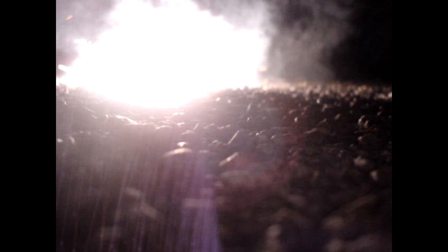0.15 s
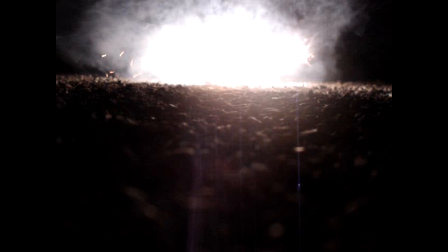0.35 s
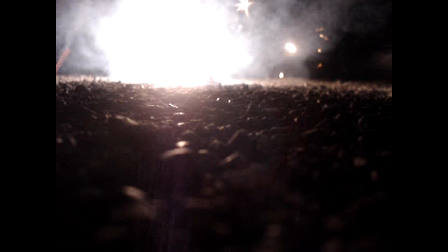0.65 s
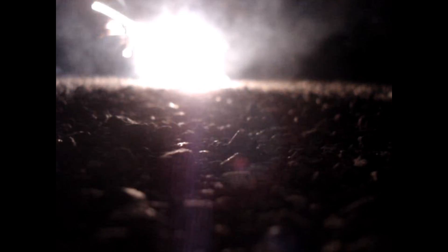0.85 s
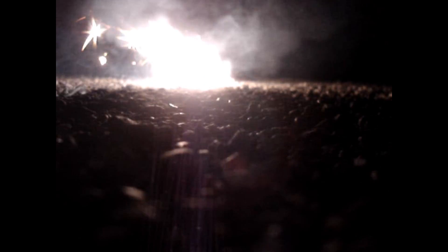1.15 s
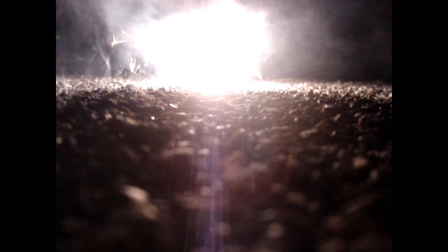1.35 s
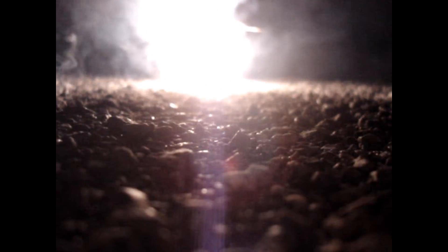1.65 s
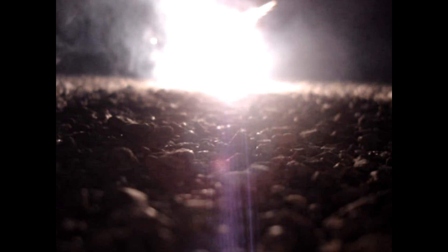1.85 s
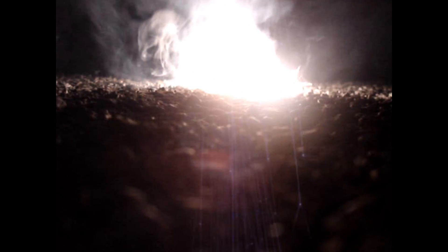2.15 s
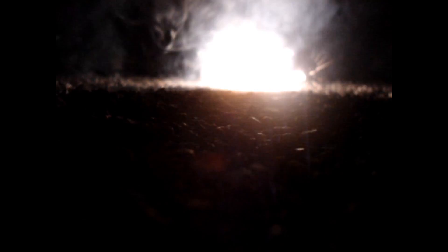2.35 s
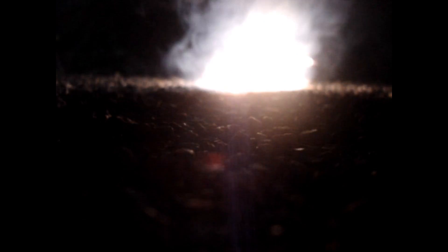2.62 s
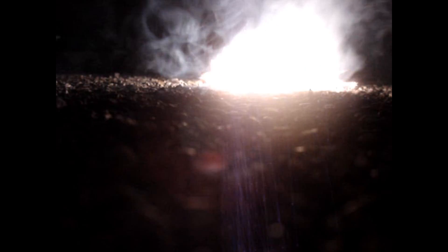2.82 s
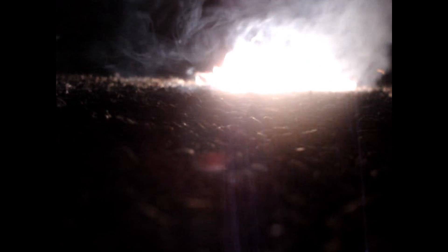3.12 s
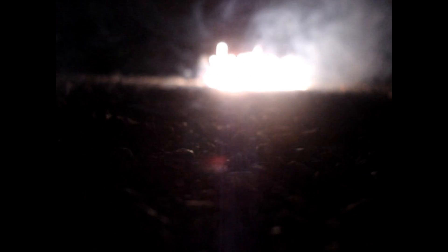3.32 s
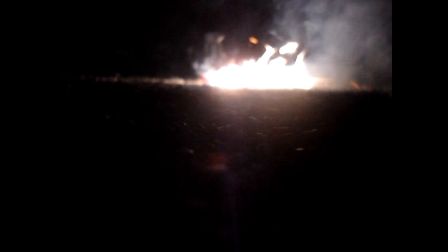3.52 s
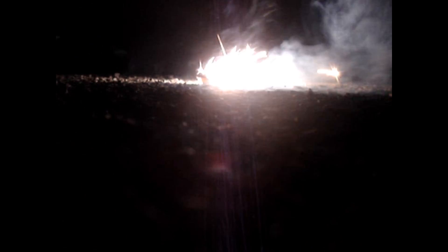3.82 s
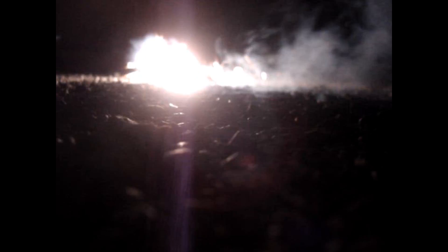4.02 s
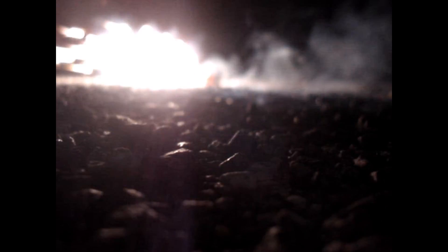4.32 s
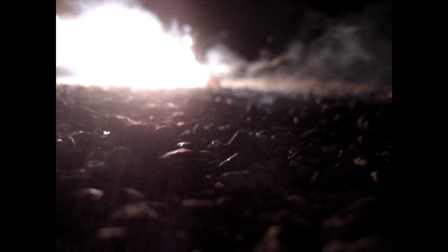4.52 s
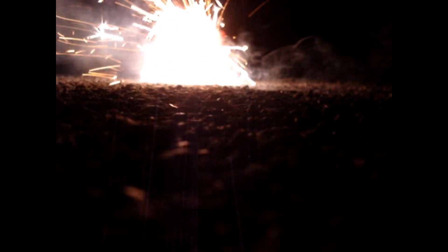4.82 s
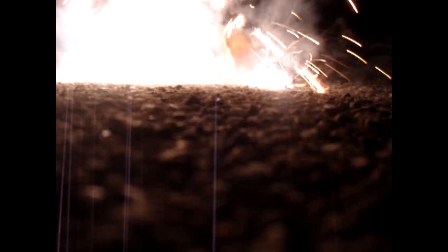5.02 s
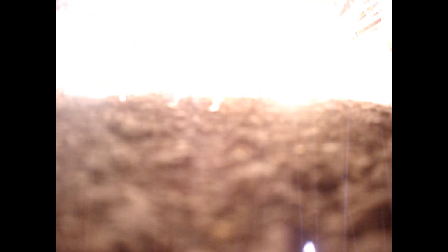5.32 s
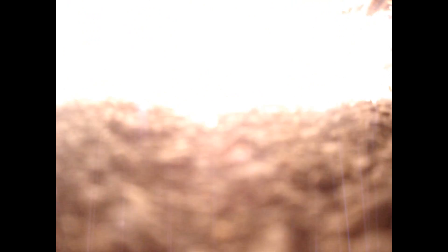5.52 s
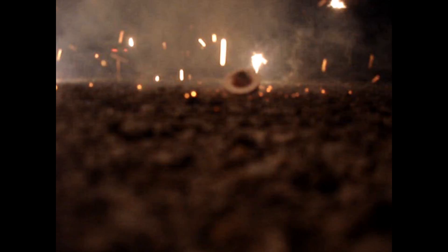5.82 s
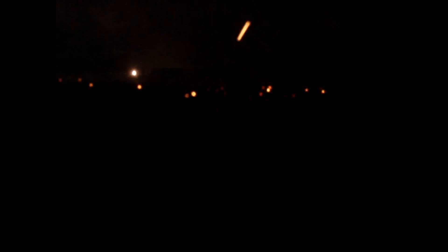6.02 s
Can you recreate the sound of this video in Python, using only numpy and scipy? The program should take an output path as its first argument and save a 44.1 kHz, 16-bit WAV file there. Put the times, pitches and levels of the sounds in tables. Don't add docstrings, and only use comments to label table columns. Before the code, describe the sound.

A close, dry recording of a burning ground firework. Turbulent gas hisses and roars steadily, swelling in short puffs, with fine crackle and one early sharp crack. It sputters, catches again in a loud snapping flare, then fades. A third of a second of machine-gun-like bursts follows, thumping the overloaded small microphone, with embers sighing and a few stragglers popping. Very faint machinery hum lies far behind.

```python
import sys
import numpy as np
from scipy import signal
from scipy.io import wavfile
from scipy.ndimage import uniform_filter1d, minimum_filter1d

SR = 44100
rng = np.random.default_rng(int(sys.argv[2]) if len(sys.argv) > 2 else 0)


def transcribe(signal):
    frames = np.atleast_2d(signal).T
    limited = np.clip(frames, -1, 1)
    pcm = np.round(limited * 32767).astype(np.int16)
    wavfile.write(sys.argv[1], SR, pcm)


def invert_db(level):
    return 10 ** (np.asarray(level, dtype=float) / 20)


N = 271638


def rms_one(x):
    return x / np.sqrt(np.mean(x ** 2) + 1e-20)


def butter(x, hz, kind, order=2):
    return signal.sosfilt(signal.butter(order, hz, kind, fs=SR, output="sos"), x)


def fade_away(x, seconds):
    return signal.lfilter([1], [1, -np.exp(-1 / (seconds * SR))], x + 1e-18)


def drift(rate):
    r = np.exp(-80 * np.pi * rate / SR)
    noise = rng.standard_normal(N // 40 + 2002)
    slow = signal.lfilter([1], [1, -2 * r, r * r], noise)[2000:]
    return np.interp(np.arange(N) / 40, np.arange(len(slow)), rms_one(slow))


def bands(source, spectrum):
    edges = 89 * 2 ** (np.arange(36) / 5)
    hz_points, db_points = np.transpose(spectrum)
    for k, (low, high) in enumerate(zip(edges, edges[1:])):
        hz = np.sqrt(low * high)
        level_db = np.interp(np.log(hz), np.log(hz_points), db_points)
        yield hz, invert_db(level_db) * butter(source[k % 2], [low, high], "band")


# frequency in Hz, level in dB per Hz.
NIGHT_COLOUR = [(35, -57), (60, -22), (886, 2), (1510, -9), (1720, -14), (9900, 8)]
# frequency in Hz, level in dB rms.
FAR_HUM = [
    (60, -72),
    (120, -61),
    (240, -58),
]


def night():
    air = sum(part for hz, part in bands(rng.standard_normal((2, N)), NIGHT_COLOUR))
    hum = np.zeros(N)
    for hz, db in FAR_HUM:
        hum += invert_db(db + 0.5 + 2.2 * drift(3.6)) * np.sin(2 * np.pi * hz * np.arange(N) / SR)
    return invert_db(-69.5) * rms_one(air), hum


# time in seconds, level in dB.
DRAUGHT = [(0, -54), (.5, -67), (1.02, -66.5), (2.5, -70), (3.8, -67), (4.25, -62), (5.3, -58), (5.5, -50),
           (5.72, -63), (5.77, -66), (5.89, -72), (5.92, -80), (6.16, -78)]


def draught():
    level_db = np.interp(np.arange(N) / SR, *np.transpose(DRAUGHT))
    return invert_db(level_db) * rms_one(butter(rng.standard_normal(N), [30, 95], "band"))


# time in seconds, hiss in dB, brightness in dB, roar in dB.
STEADY_BURN = [(0.0, -28, -1.5, -7.5), (0.17, -30.5, 1, -7.5), (0.5, -31.5, 1.5, -7.5), (0.58, -27, 0, -9),
               (0.76, -28, -3, -12), (1.02, -30.5, 3.5, -9.5), (1.4, -30.5, 3.5, -10),
               (1.62, -30.5, -5, -11), (1.92, -28.5, -2, -11.5), (2.08, -33, -0.5, -9.5),
               (2.58, -34.5, -7.5, -8), (2.7, -31.5, 5, -9), (2.9, -30, 2.5, -9.5),
               (3.52, -29.5, 0.5, -8.5), (3.68, -31.5, 0, -9), (3.9, -29, -3, -9),
               (4.42, -28.5, 0.5, -10.5), (4.73, -26.5, -1.5, -9)]
# time in seconds, hiss in dB, brightness in dB, roar in dB.
FALTER = [
    (4.75, -30, 5, -10),
    (4.785, -35.5, -13, -3),
    (4.8, -43.5, -11, -4.5),
    (4.87, -42, -18, -2.5),
    (4.893, -34, 6, -8),
    (4.915, -24.5, 3, -5),
    (4.94, -23, -5, -10),
]
# time in seconds, hiss in dB, brightness in dB, roar in dB.
DYING = [
    (4.97, -29, -2, -12),
    (5.006, -33, -14, -6),
    (5.082, -35, -22.5, -4),
    (5.11, -43, -10, -3),
    (5.208, -48.5, 0, -6),
    (5.3, -48, -2, -3),
    (5.32, -58, -1, -2),
    (5.77, -69, 4.5, -7),
    (6.16, -75, -4, -5),
]
# peak in seconds, gain in dB, rise in seconds, fall in seconds.
SURGES = [(0.104, 2.5, 0.11, 0.054), (0.266, 7, 0.087, 0.015), (0.345, 4.5, 0.059, 0.091),
          (0.73, 0.5, 0.11, .03), (1.15, 2, 0.064, 0.13), (1.468, 5, 0.044, 0.096), (1.764, 3, 0.1, 0.029),
          (1.84, -0.5, 0.031, .06), (2.22, 2, 0.03, 0.12), (2.73, 0, 0.072, 0.022), (3.22, 2, 0.032, 0.031),
          (3.76, 3.5, 0.072, 0.18), (4.15, 2, 0.11, 0.045), (4.33, 2.5, .04, 0.096),
          (4.81, 9, 0.0091, 0.012), (4.836, 7.5, .012, 0.032)]
# start in seconds, level in dB, fade in dB per second.
EMBERS = [
    (5.35, -51, 23),
    (5.386, -54, 31),
    (5.66, -55.5, 120),
    (5.77, -51, 137),
]


def effort():
    t = np.arange(N) / SR
    s, hiss_db, bright_db, roar_db = np.transpose(STEADY_BURN + FALTER + DYING)
    surge_db = np.zeros(N)
    for peak, db, rise, fall in SURGES:
        surge_db += db * np.clip(np.minimum(1 + (t - peak) / rise, 1 - (t - peak) / fall), 0, 1)
    hiss_db = np.interp(t, s, hiss_db) + surge_db
    for start, db, fade in EMBERS:
        sigh_db = np.where(t > start, db - fade * (t - start), -np.inf)
        hiss_db = np.maximum(hiss_db, sigh_db)
    bright_db = np.interp(t, s, bright_db) - 0.2 * surge_db
    roar_lag_s, roar_inertia = 0.069, 0.37
    r = np.exp(-1 / (roar_lag_s * SR))
    trailing_db = hiss_db[0] + signal.lfilter([1 - r], [1, -r], hiss_db - hiss_db[0])
    roar_db = np.interp(t, s, roar_db) + roar_inertia * (trailing_db - hiss_db)
    return hiss_db, bright_db, roar_db


# frequency in Hz, level in dB per Hz.
JET_COLOUR = [(100, -22), (125, -15), (165, -14.5), (240, -10.5), (620, -8), (1350, -6), (1650, -3.5),
              (2600, -2), (3400, -3.5), (4200, -7.5), (5000, -2), (5800, -1.5), (7200, -6), (9900, -15)]


def jet(spark_db, sparks_per_s, flutter_db, patchy_db):
    usual_bright_db, usual_roar_db, jet_db = 2.5, -9, 5
    hiss_db, bright_db, roar_db = effort()
    sizes = invert_db(8 * np.minimum(rng.exponential(1, N), 4))
    sparks = sizes * (rng.random(N) < sparks_per_s / SR)
    snaps = rms_one(butter(sparks, 3500, "high", order=1))
    stand_out_db = np.clip(-30 - hiss_db, 0, 5)
    source = rng.standard_normal((2, N)) + invert_db(spark_db + stand_out_db) * snaps
    flutter = flutter_db * (drift(1.9) + 0.49 * drift(45.0))
    out, plain = np.zeros((2, N))
    for hz, part in bands(source, JET_COLOUR):
        top = np.clip(np.log2(hz / 2700) * 0.61, 0, 1)
        low = np.clip(np.log2(1600 / hz), 0, 1)
        if hz > 7000:
            top = top * 0.7
        tilt_db = top * (bright_db - usual_bright_db) + low * (roar_db - usual_roar_db)
        out += part * invert_db(tilt_db + flutter + patchy_db * drift(5.3))
        plain += part
    return invert_db(hiss_db + jet_db) * out / np.std(plain)


# time in seconds, crack in dB, push of air in dB, debris in dB.
LONE_STARS = [(1.7673, -5, -39, -29), (4.79, -17.5, -25, -29), (4.8348, -15, -42, -31),
              (4.8535, -15, -32, -39), (4.9197, -5, -40, -17), (4.9367, 0, -16.5, -45),
              (5.1807, -29, -39, -30), (5.2176, -5, -35, -38), (5.2393, -13.5, -36, -41),
              (5.6527, -21, -37, -54), (5.6774, -21, -55, -42), (5.728, -21, -18, -20),
              (5.737, -12, -41, -23.5), (5.7398, -25, -37, -27), (5.7445, -26, -47, -25),
              (5.75, -23, -18.5, -19.5), (5.7617, -24, -41, -34), (5.925, -31, -58, -49),
              (6.0095, -18, -54, -40), (6.0276, -28, -63, -67), (6.046, -29, -55, -41),
              (6.0732, -36.5, -55, -65), (6.1122, -22.5, -60, -60)]
# time in seconds, crack in dB, push of air in dB, debris in dB.
VOLLEY = [(5.3297, -3, -26, -36), (5.336, -6.5, -38, -26), (5.3476, 0, -25, -21.5),
          (5.3838, -5, -20.5, -27), (5.4067, -6, -15, -30), (5.4103, -5, -22, -32),
          (5.4449, -17, -19.5, -24), (5.4528, -8, -19, -22.5), (5.4577, -21, -35, -35),
          (5.4664, -11, -20, -29), (5.4702, -8, -16.5, -24.5), (5.4735, -2, -28, -46),
          (5.4851, -6.5, -23, -25), (5.505, -7, -41, -18.5), (5.5092, -12, -14.5, -30),
          (5.5134, -10, -22, -20), (5.5213, -12, -20, -24), (5.5282, -21, -13.5, -28),
          (5.5333, -13, -17, -26), (5.538, -17, -35, -28), (5.543, -21, -43, -26),
          (5.5466, -19, -13.5, -45), (5.5573, -11, -15, -27), (5.5684, -17, -14, -33),
          (5.5785, -7, -11.5, -35), (5.5808, -13, -39, -43.5), (5.5895, -6, -39, -26),
          (5.6026, -4.5, -45, -35), (5.6169, -28, -43, -36), (5.6318, -13, -21, -18)]
# start in seconds, length in milliseconds, level in dB.
FIZZES = [(5.3312, 3.9, -20), (5.501, 1.8, -41), (5.394, 3.5, -46), (5.42, 4.5, -40.5), (5.433, 2.4, -61),
          (5.451, 20, -32), (5.507, 5.9, -39), (5.535, 12, -38), (5.616, 6.2, -33), (5.74, 5.2, -35),
          (5.208, 7.1, -36)]


def stars():
    shock, push, spray, fizz = np.zeros((4, N + 200))
    for table, usual_ms in ((LONE_STARS, 0.22), (VOLLEY, 0.15)):
        chances = rng.standard_normal((len(table), 2))
        for (s, crack_db, push_db, debris_db), (toss, size) in zip(table, chances):
            sign = np.sign(toss + 0.7)
            width_ms = usual_ms * invert_db(5.5 * size)
            at = round(s * SR) - 1
            phase = np.arange(200) / max(0.4 * width_ms * SR / 1000, 1.5)
            height = max(invert_db(crack_db + 2.8) - invert_db(push_db + 1.0), invert_db(crack_db - 12.0))
            shock[at:at + 200] += sign * height * (1 - phase) * np.exp(-.8 * phase)
            push[at] += sign * invert_db(push_db + 5.5)
            spray[at + 4] += invert_db(debris_db + 3.0)
    for s, length_ms, level_db in FIZZES:
        fizz[round(s * SR):round((s + length_ms / 1000) * SR)] = invert_db(level_db)
    push_s, mic_low_hz, debris_s = 0.0015, 234, 0.0016
    swing = butter(fade_away(push, push_s), mic_low_hz, "high")
    cracks = butter(butter(shock, 240, "high") + swing, 5500, "low", order=1)
    dying = fade_away(spray, debris_s) + uniform_filter1d(fizz, size=40)
    grit = rng.standard_normal(N) * invert_db(0.87 * drift(440.0))
    debris = dying[:N] * rms_one(butter(grit, [1000, 6500], "band", order=1))
    return cracks[:N] + debris


# time in seconds, depth in dB.
DUCKS = [(0.269, -2), (1.085, -6), (1.491, 3), (1.595, 6.5), (1.77, 3), (2.012, 1.5), (2.132, 2), (3.28, 2),
         (3.57, 4), (4.916, 3.5), (4.938, 25), (5.218, 3), (5.338, -1), (5.349, 5.5), (5.409, 25),
         (5.636, -2)]


def gain_control():
    drops = np.zeros(N)
    for s, depth_db in DUCKS:
        drops[round(s * SR)] = max(depth_db, 0)
    recovery_s = 0.023
    return invert_db(-fade_away(drops, recovery_s))


def scene():
    air, hum = night()
    burn = jet(spark_db=-4.0, sparks_per_s=740, flutter_db=0.13, patchy_db=0.78) + draught()
    audible = np.clip((5.3 - np.arange(N) / SR) / 0.52, .03, 1)
    gain = gain_control()
    offset_db = -34.5
    thump = butter(invert_db(offset_db) * (gain - 1), 11, "high", order=1)
    return np.tile(gain * (burn + air + audible * hum) + thump + stars(), (2, 1))


def starve(x, margin_db, tilt_db, shelf_db, luck_db, hole_share, smear_db):
    frame_s, first_frame_s = 576 / 22050, .0084
    hz, s, spec = signal.stft(x, SR, nperseg=256)
    band, band_hz = np.arange(len(hz)) // 2, hz[::2, None]
    size = np.sqrt([np.mean(np.abs(spec[band == k]) ** 2, axis=0) for k in range(band.max() + 1)])
    frame_peak = np.zeros(int(N / SR / frame_s) + 3)
    sample_frame = ((np.arange(N) / SR - first_frame_s) / frame_s + 1).astype(int)
    np.maximum.at(frame_peak, sample_frame, np.abs(x))
    frame = (s - first_frame_s) / frame_s + 1
    peak = np.maximum(frame_peak[frame.astype(int)], frame_peak[(frame - .5).astype(int)])
    luck = uniform_filter1d(rng.standard_normal(size.shape), size=3) * np.sqrt(3)
    upper = band_hz > 4700
    need_db = 20 * np.log10(peak + 1e-9) - margin_db
    need_db = need_db + upper * (shelf_db + tilt_db * np.log2(band_hz / 5000 + .1))
    need_db = need_db + 2.7 * np.minimum(np.log2(band_hz / 2500 + .02), 0)
    held = -minimum_filter1d(-size ** 2, size=3)
    held_db = 10 * np.log10(uniform_filter1d(held, size=3, axis=0) + 1e-20)
    keep = np.clip((held_db - need_db - luck_db * luck) / 2, .02, 1)
    missed = upper & (rng.random(size.shape) < hole_share)
    holes = minimum_filter1d(minimum_filter1d(1. - missed, size=3), size=2, axis=0)
    keep *= np.maximum(holes, .02)
    grain = rng.standard_normal(spec.shape) + 1j * rng.standard_normal(spec.shape)
    spec = (spec + invert_db(smear_db) * size[band] * grain) * keep[band]
    return signal.istft(spec, SR, nperseg=256)[1][:N]


def roll_off(x):
    return signal.sosfilt(signal.butter(12, 10780, fs=SR, output="sos"), x)


def record(dry):
    mono = starve(dry[0], margin_db=54.5, tilt_db=0.0, shelf_db=9.0, luck_db=3.0, hole_share=.013, smear_db=-19.5)
    steep_cut = signal.firwin(601, 10120, window=("kaiser", 7), fs=SR)
    mono = signal.fftconvolve(mono, steep_cut, "same")
    mix = np.tile(np.clip(mono, -.48, .48), (2, 1))
    return roll_off(mix)


dry = scene()
out = record(dry)
transcribe(out)
```